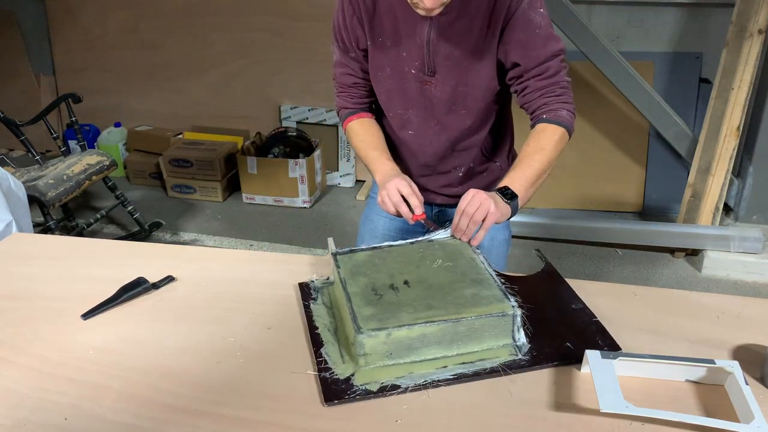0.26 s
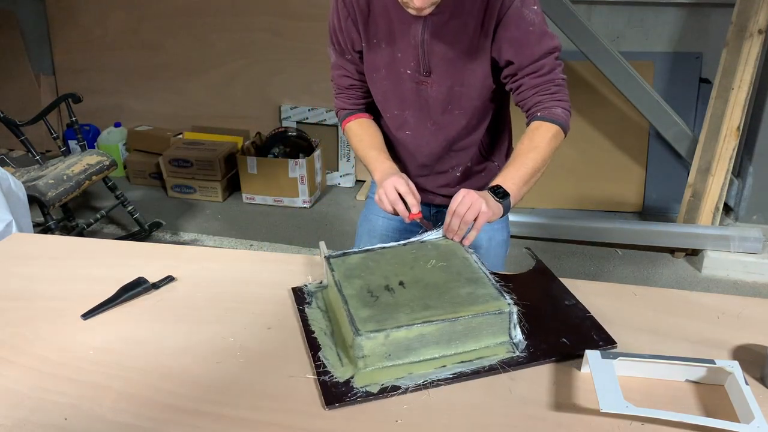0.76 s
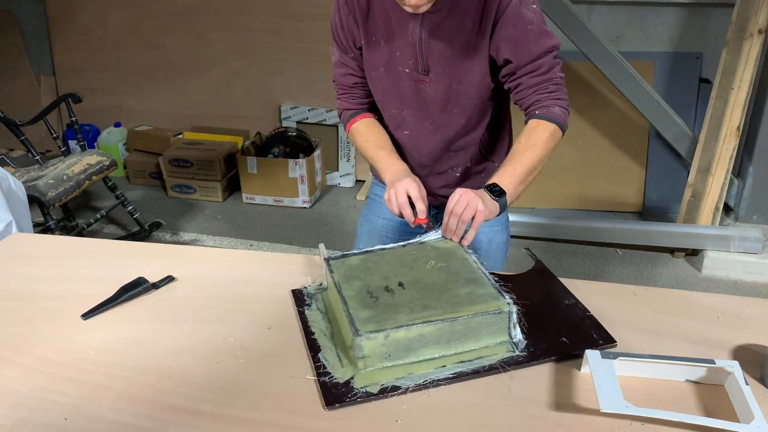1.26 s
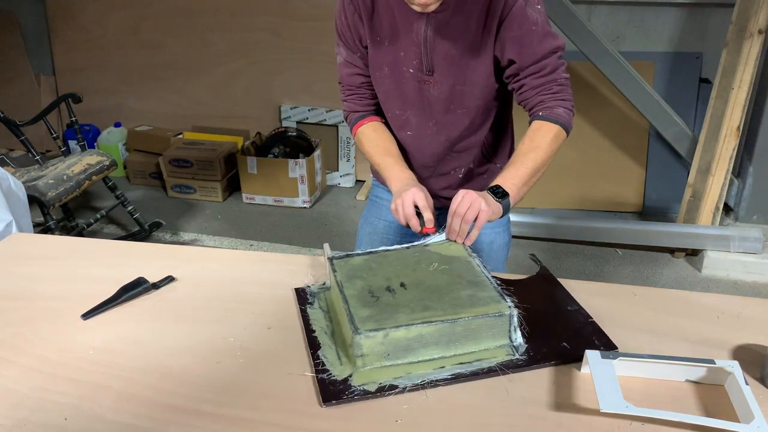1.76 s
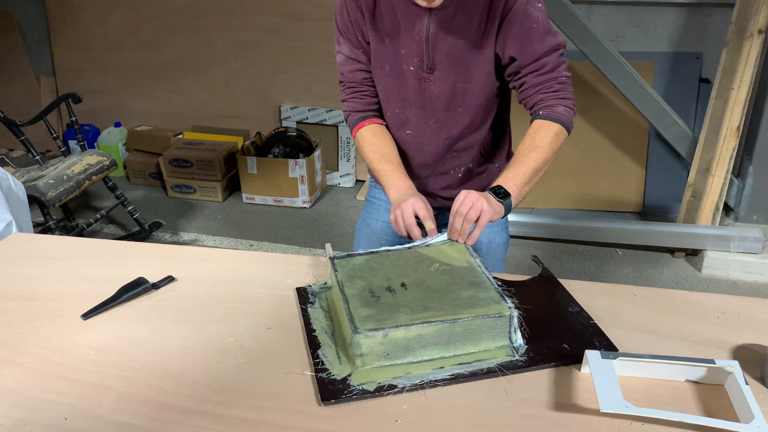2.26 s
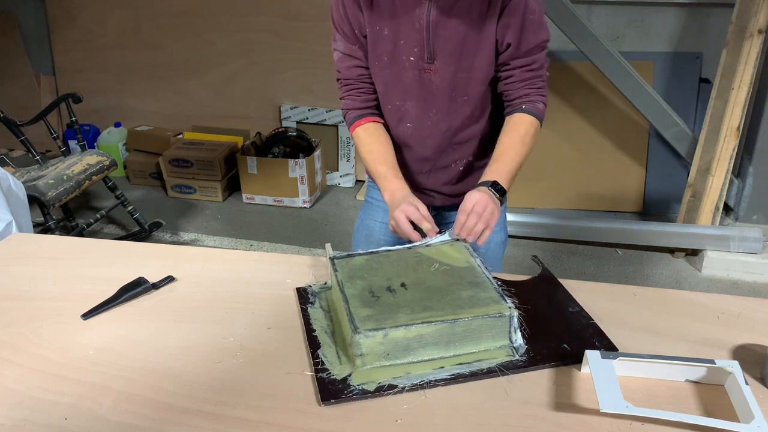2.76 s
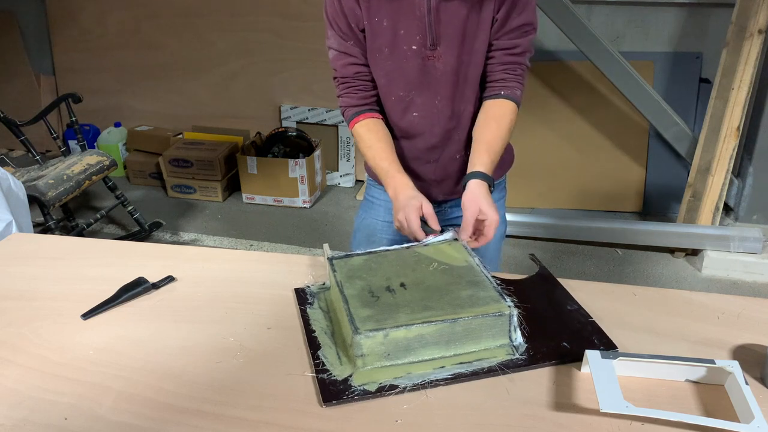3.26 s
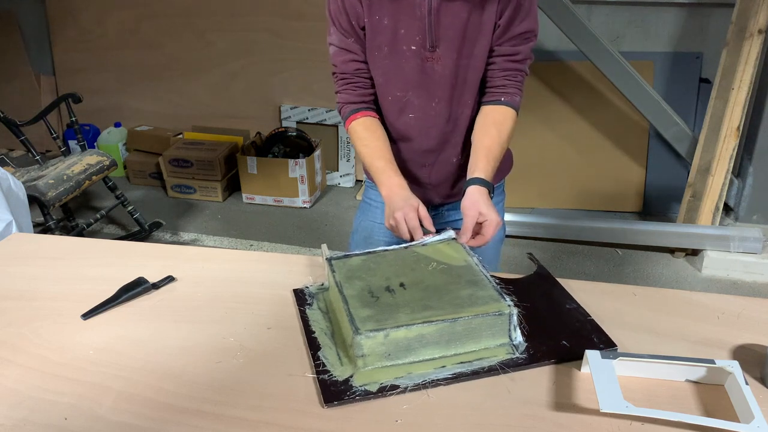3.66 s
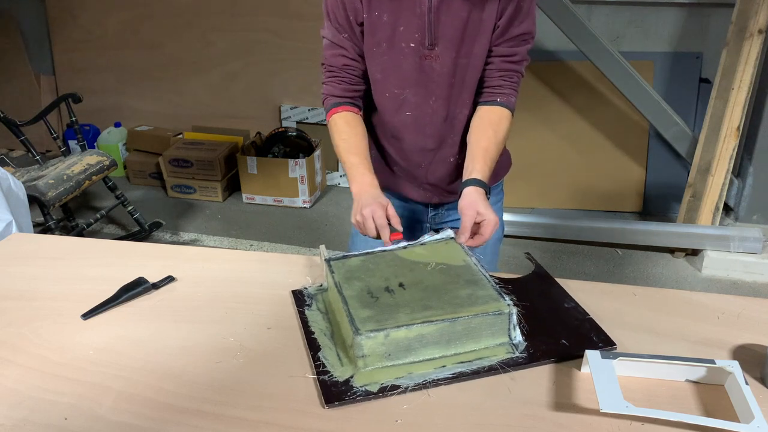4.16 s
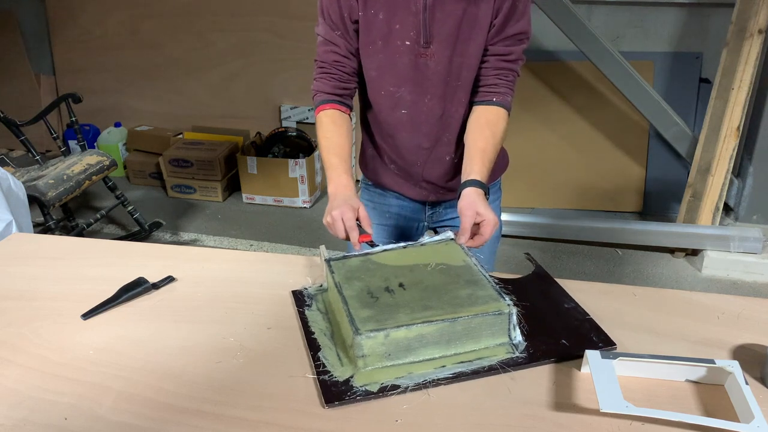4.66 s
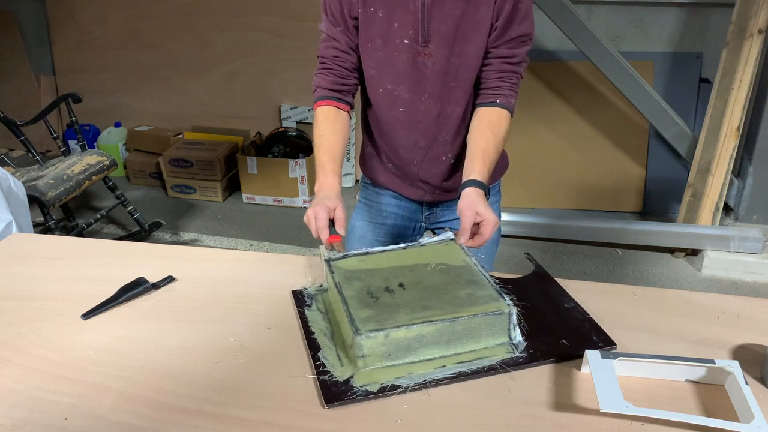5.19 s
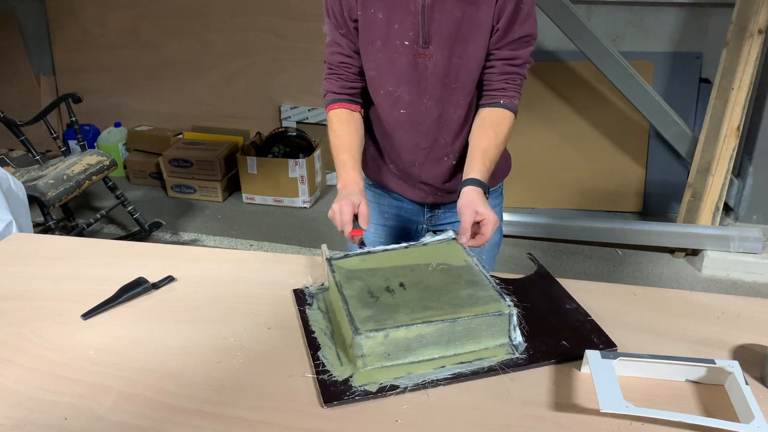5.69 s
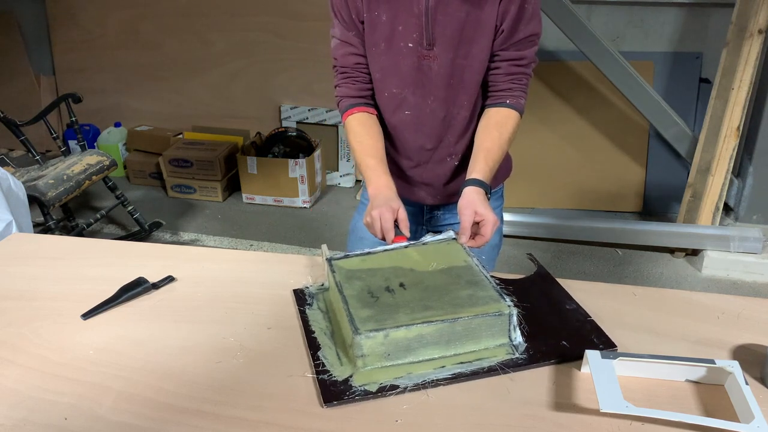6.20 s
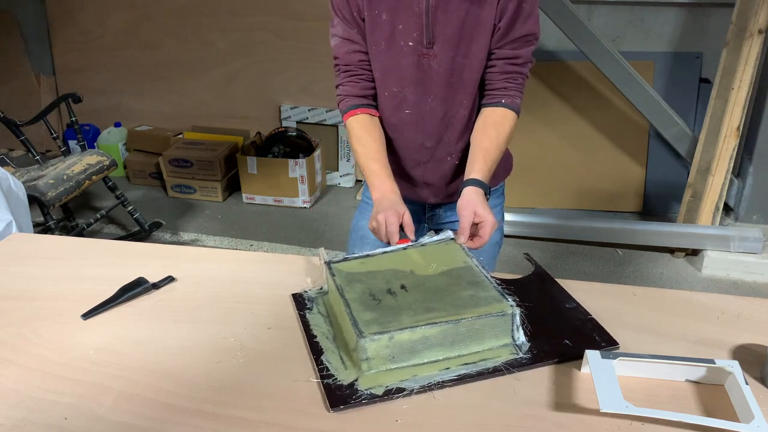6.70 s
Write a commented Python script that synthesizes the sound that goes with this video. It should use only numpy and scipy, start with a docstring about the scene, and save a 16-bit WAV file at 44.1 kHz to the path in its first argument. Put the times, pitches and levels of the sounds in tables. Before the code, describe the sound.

A hard fibreglass shell is pried off a wooden mold in a reverberant workshop, heard in stereo from fairly near over soft ventilation rumble and thin hiss. The hall's fading ring opens the scene; small sharp ticks come at 0.2-0.3 s, with a dull knock at 0.6. From 1.1 s crackling thickens into rasping, tearing fibres and bright snaps, loudest from 1.8 to 2.1 s, then dies by 2.3. Low thumps at 2.75 and 2.9 lead to faint splinter pings and a short stick-slip groan around 3.35. A hard crack lands at 4.15; from 4.4 snaps and gritty rubbing build to a strong final crack at 5.02. Dull knocks follow at 5.3-5.5, a brief wedge scrape at 5.75, and light chafing until 6.5. One more snap comes at 6.74, and a brighter sliding swish rises at the end, near 7 s.

```python
"""In an echoing workshop, a cured fibreglass shell is pried off a waxed wooden mold with a wedge, on a table.
With each push the bond lets go in sharp snaps, short noise bursts that set shell and rim ringing, over a
rasp of tiny fibre breaks made of noise grains. The mold knocks and groans on the table as ringing modes and
a stick-slip tone, the wedge slides and chafes along the rim as filtered grit, splinters ping, and the hall
rumbles softly and sends back reflections. In names, t60 is the time in which a sound fades by 60 dB."""
import sys
import numpy as np
from scipy import signal
from scipy.fft import rfft, irfft, next_fast_len
from scipy.io import wavfile
from scipy.ndimage import uniform_filter1d, map_coordinates

SR = 44100
rng = np.random.default_rng(int(sys.argv[2]) if len(sys.argv) > 2 else 0)


def wav_out(sig):
    """Save sig, one row per channel (or a flat mono array), as 16-bit PCM at SR to the path in sys.argv[1]."""
    wavfile.write(sys.argv[1], SR, np.round(np.clip(np.atleast_2d(sig).T, -1, 1) * 32767).astype(np.int16))


N = 306054


def amp(db):
    """Turn decibels into a gain."""
    return 10 ** (np.asarray(db) / 20)


def unit(x):
    """Scale a sound to an average (rms) level of 1."""
    return x / np.sqrt(np.mean(x ** 2) + 1e-20)


def burst(x):
    """Scale a short sound to the energy of 10 ms at rms 1."""
    energy = np.mean(np.sum(x ** 2, axis=-1))
    return x / np.sqrt(energy / (SR / 100) + 1e-20)


def along(points, hz):
    """Read a curve of (Hz, value) points at any pitch, on a log pitch axis."""
    point_hz, value = np.transpose(points)
    return np.interp(np.log(hz + 1), np.log(point_hz + 1), value)


def curves(rows):
    """Draw one value per sample for each column after the time."""
    time_s, *columns = np.transpose(rows)
    return [np.interp(np.arange(N) / SR, time_s, column) for column in columns]


def wobble(rate):
    """Make a smooth random curve with `rate` turning points drawn per second."""
    knots = rng.standard_normal(int(N * rate / SR) + 4)
    return map_coordinates(knots, [np.arange(N) * rate / SR])


def filtered(x, response):
    """Multiply the spectrum of x by a response that depends on pitch."""
    n = x.shape[-1]
    padded = next_fast_len(n + 2048)
    hz = np.fft.rfftfreq(padded, 1 / SR)
    return irfft(rfft(x, padded) * response(hz), padded)[..., :n]


def coloured(x, points):
    """Shape x with a tone colour given as (Hz, dB) points."""
    return filtered(x, lambda hz: amp(along(points, hz)))


def resonate(x, peaks):
    """Send x through side-by-side resonances (pitch_hz, width_hz, level_db), then scale to rms 1."""
    def response(f):
        total = 0
        for k, (hz, width, db) in enumerate(peaks):
            peak = 1j * f * width / (hz * hz - f * f + 1j * f * width)
            total = total + (-1) ** k * amp(db) * peak  # neighbours have opposite signs
        return total

    return unit(filtered(x, response))


# how alike left and right are in the hall's diffuse sound: pitch_hz, likeness (1 = the same)
HALL_LIKENESS = [(60, .98), (150, .93), (300, .8), (600, .15), (2000, .2), (5000, .15), (8000, .94),
                 (15000, .97)]


def diffuse(pair):
    """Blend two unrelated sounds so left and right are as alike as sound from all sides at two microphones."""
    def shares(hz):
        turn = np.arccos(np.clip(along(HALL_LIKENESS, hz), -1, 1)) / 2
        return np.array([np.cos(turn), np.sin(turn)])

    mid, side = filtered(pair, shares)
    return np.array([mid + side, mid - side])


def add(track, s, sound):
    """Mix a sound into a track at s seconds; it may already be under way at time 0."""
    at = round(s * SR)
    start = max(at, 0)
    sound = sound[..., max(-at, 0):]
    track[..., start:start + sound.shape[-1]] += sound[..., :N - start]


def ring(modes, t, scatter_db, detune, spread):
    """Ring a body's modes in stereo, each with a random strength, pitch shift and left-right phase."""
    hz, db, t60 = np.transpose(modes)[:, :, None]
    size, shift, phase, turn = rng.standard_normal((4, len(modes), 1))
    decay = amp(db + scatter_db * size - 60 * t / t60)
    angle = 2 * np.pi * (hz * (1 + detune * shift) * t + phase)
    return np.array([np.sum(decay * np.sin(angle + side * spread * turn), axis=0) for side in (1, -1)])


def splinter(t, spectrum, t60, jag_db):
    """Make a short jagged spray of fading noise, a little different on the left and right."""
    mid, side = coloured(rng.standard_normal((2, len(t))), spectrum) * [[1], [.3]]
    jags = np.interp(np.arange(len(t)), np.linspace(0, len(t), 100), rng.standard_normal(100))
    return np.array([mid + side, mid - side]) * amp(jag_db * jags - 60 * t / t60)


def crackle(rate, size_db, grain_t60):
    """Break noise into fading grains of very unequal size, about `rate` of them a second."""
    sizes = amp(size_db * np.minimum(rng.exponential(size=N), 3))
    breaks = (rng.random(N) < rate / SR) * sizes
    fade = amp(-120 * np.arange(SR // 50) / SR / grain_t60)  # power, so 60 dB down after grain_t60
    power = signal.fftconvolve(breaks ** 2, fade)[:N]
    return np.sqrt(np.abs(power)) * rng.standard_normal((2, N))


# tone of the hall's low noise: pitch_hz, level_db
RUMBLE_COLOUR = [(13, -40.5), (22, -27), (40, -9), (91, -2), (134, -7), (151, -10), (187, -6), (238, -12),
                 (269, -14.5), (298, -9.5), (361, -19), (608, -26), (749, -19.5), (907, -32), (1400, -48.5),
                 (1820, -81), (3080, -120)]


def hall():
    """Ventilation rumbles as low noise that drifts in level, with a faint hum and a thin hiss."""
    rumble = unit(coloured(diffuse(rng.standard_normal((2, N))), RUMBLE_COLOUR))
    hum = np.sin(2 * np.pi * 299 * np.arange(N) / SR + wobble(9))
    hiss_colour = [(500, -11.5), (2000, -6), (6000, -7.5), (12000, -12.0), (16000, -21.5)]  # Hz, dB
    hiss = unit(coloured(diffuse(rng.standard_normal((2, N))), hiss_colour))
    return (amp(-51 + 3.4 * wobble(3.8)) * rumble
            + amp(-65 + 3 * wobble(5)) * hum
            + amp(-78.5 + 1.4 * wobble(12)) * hiss)


# tone of the hall's fading ring: pitch_hz, level_db
FADING_COLOUR = [(400, -7), (1500, -5), (3000, -5), (5000, 5.5), (7000, 8), (11000, 4.5), (16000, -5)]


def fading(start_db=-44, t60=0.45):
    """The hall is still ringing from an earlier break: a wash of noise that fades from the start."""
    wash = unit(coloured(diffuse(rng.standard_normal((2, N))), FADING_COLOUR))
    return wash * amp(start_db - 60 * np.arange(N) / SR / t60)


def radiated(x, smear_s=0.011):
    """Each direction gets its own mix of upper modes, so the hall gets them as noise of the same smoothed shape."""
    low = filtered(x, lambda hz: 1 / (1 + (hz / 1300) ** 6))
    _, frames, z = signal.stft(x - low, SR, nperseg=128)
    power = uniform_filter1d(np.abs(z) ** 2, size=5, axis=0)  # blur over pitch
    power = signal.lfilter([1], [1, -np.exp(-frames[1] / smear_s)], power)  # blur over time
    grain = signal.stft(rng.standard_normal(N), nperseg=128)[2]
    high = signal.istft(grain * np.sqrt(np.abs(power)), nperseg=128)[1][:N]
    return low + unit(high) * np.std(x - low)


# how long the hall rings: pitch_hz, t60_s
HALL_T60 = [(100, .5), (300, .55), (800, .8), (2100, 1.0), (4000, .84), (6000, .73), (10000, .48),
            (15000, .33)]
# strength of the late ring: pitch_hz, level_db
LATE_COLOUR = [(200, 0.5), (700, 3.5), (1150, -5), (1700, -1), (2200, -3), (2600, -4), (3300, -0.5),
               (3900, -1.5), (5500, -3.5), (10000, -7.5), (15000, -7.5)]
EARLY_T60_S = .08  # table and near walls


def room(x, ringing, early_db=-14, late_db=-6.5, ringing_db=3):
    """Table and near walls give a short answer, the hall a long one; narrow tones keep their pitch in it."""
    hz, t, z = signal.stft(rng.standard_normal((2, SR)), SR, nperseg=256)
    late = z * amp(-60 * t / along(HALL_T60, hz)[:, None])
    late = signal.istft(late, SR, nperseg=256)[1][:, :SR]
    early_shape_db = 1.9 * rng.standard_normal(SR) - 60 * np.arange(SR) / SR / EARLY_T60_S
    early = rng.standard_normal((2, SR)) * amp(early_shape_db)

    def answer(source, tail):
        """Send the source through one set of reflections, 4 ms late."""
        tail = diffuse(tail / np.linalg.norm(tail[0]))
        tail = np.pad(tail, ((0, 0), (SR // 250, 0)))
        return signal.fftconvolve(source[None], tail, axes=1)[:, :N]

    mono = x.mean(axis=0)
    into_hall = coloured(radiated(mono) + amp(ringing_db) * ringing, LATE_COLOUR)
    return amp(early_db) * answer(mono + ringing, early) + amp(late_db) * answer(into_hall, late)


# stick-slip of the mold on the table: time_s, slips_per_s, level_db
GROAN = [(3.31, 130, -76), (3.324, 155, -45.5), (3.36, 130, -37), (3.39, 92, -40.5), (3.42, 98, -50.5),
         (3.46, 92, -71)]


def groan():
    """Stick-slip pushes the board in a short, mostly falling groan, a wavering tone with five harmonics."""
    rate, db = curves(GROAN)
    phase = 2 * np.pi * np.cumsum(rate * (1 + 0.041 * wobble(110))) / SR
    harmonics_db = [24.5, 23.5, -18.0, 0.5, -7.0]
    tone = sum(amp(level) * np.cos(k * phase) for k, level in enumerate(harmonics_db, start=1))
    floor = amp(max(db[0], db[-1]))  # silent outside the groan
    return unit(tone) * np.maximum(amp(db) - floor, 0)


# dull knocks of the mold: start_s, level_db (before a trim), hardness_hz, table_ring_db
KNOCKS = [(0.28, -47.5, 424, -13), (0.622, -38.5, 325, -2.5), (0.632, -32, 115, -7),
          (1.383, -32.5, 114.7, -24), (1.52, -44.5, 432.7, 2.5), (1.995, -42.5, 483, -5),
          (2.046, -37, 386, -12), (2.747, -43, 292, -4.5), (2.886, -27.5, 109.7, -41),
          (4.146, -40.5, 604, -3.5), (4.547, -45, 453, -3), (4.814, -39, 386, 0), (4.891, -42, 450, 1),
          (5.021, -39, 720, 2), (5.299, -29, 106.8, -29), (5.42, -36, 90.9, -28), (5.532, -35, 91, -29),
          (5.792, -43.5, 400, -0.5), (6.741, -39, 1050, -10)]
# ringing modes of the mold board on its table: pitch_hz, level_db, t60_s
BOARD = [(80, -6, 0.5), (106, -5, 0.065), (179, -5, 0.22), (249.4, 2.5, 0.22), (274, 1.5, 0.07),
         (361, -6, 0.11), (530, -10.5, 0.011), (649, 5, 0.036), (817, 5.5, 0.041)]
TABLE_HZ, TABLE_T60_S = 378, 0.16  # ring of the table top


def knocks(trim_db=-3.5, thud_db=-5, thud_t60=0.066, rise_s=0.0015):
    """The mold rocks on the table; a soft contact wakes only the lowest modes, with a thud of low noise."""
    out, t = np.zeros((2, N)), np.arange(SR // 3) / SR
    for s, db, hard_hz, table_db in KNOCKS:
        modes = []
        for hz, level, t60 in BOARD:
            softening_db = 10 * np.log10(1 + (hz / hard_hz) ** 6)
            modes.append((hz, level - softening_db, t60))
        modes.append((TABLE_HZ, table_db, TABLE_T60_S))
        board = ring(modes, t, scatter_db=2, detune=.035, spread=.08)
        thud_colour = [(30, -15), (hard_hz / 2, 0), (hard_hz, -3), (0.57 * hard_hz, -24), (8000, -80)]
        thud = unit(coloured(rng.standard_normal(len(t)), thud_colour))
        thud = amp(thud_db - 60 * t / thud_t60) * thud
        add(out, s, amp(db + trim_db) * (1 - np.exp(-t / rise_s)) * (board + thud))
    return out


# the wedge slides along the rim, twice: time_s, level_db
SLIDE = [(5.56, -82), (5.62, -60.5), (5.7, -51), (5.75, -46), (5.8, -47.5), (5.85, -55), (5.93, -82),
         (6.85, -83), (6.89, -59.5), (6.94, -38.5)]
# tone of the sliding grit: pitch_hz, level_db
SLIDE_COLOUR = [(300, -6), (550, -6.5), (900, 1.5), (1200, -4.5), (2200, 3), (3500, -6.5), (7000, -14),
                (15000, -29)]
# the rim's answer to a fast slide: pitch_hz, width_hz, level_db
SLIDE_RING = [(1100, 160, -3.5), (1750, 250, -1), (2160, 220, 2), (2750, 250, -3)]
SLIDE_FULL_DB, SLIDE_RING_DB = -45, -5.5  # level that counts as full speed; the rim's answer at that speed


def slide(rise_db=7, judder_db=2):
    """The wedge drags along the rim with a fine-grained swish that grows brighter as it speeds up."""
    [level_db] = curves(SLIDE)
    gain = amp(level_db) - amp(level_db.min())
    speed = np.clip(gain / amp(SLIDE_FULL_DB), 0, 1)
    grit = crackle(rate=4000, size_db=1, grain_t60=.012)
    grit = unit(coloured(diffuse(grit), SLIDE_COLOUR))
    dull = filtered(grit, lambda hz: 1 / (1 + (hz / 1250) ** 4))
    bright = (grit - dull) * amp(rise_db * (speed - 1.0))
    sing = resonate(crackle(rate=500, size_db=3, grain_t60=.006)[0], SLIDE_RING)
    sing = amp(SLIDE_RING_DB) * speed * sing
    return gain * amp(judder_db * wobble(70)) * (dull + sing + bright)


# the wedge chafes lightly on the rim: time_s, level_db
CHAFE = [(5.84, -77), (5.93, -61), (6.05, -73), (6.17, -71), (6.31, -86), (6.37, -76), (6.43, -65),
         (6.48, -75), (6.53, -94)]
# what the chafing excites: pitch_hz, width_hz, level_db
CHAFE_RING = [(1070, 81, -3.5), (2058, 290, -2), (2730, 150, 2), (4630, 390, -9), (6750, 340, -6)]


def chafe():
    """Light uneven slips of the wedge ring a few narrow resonances of the rim."""
    [level_db] = curves(CHAFE)
    slips = crackle(rate=250, size_db=3, grain_t60=.008)[0]
    return (amp(level_db) - amp(level_db.min())) * resonate(slips, CHAFE_RING)


# loose splinters ping and creak, and the first row is a broad sizzle near 4.9 kHz from the wedge rubbing during
# its push: start_s, pitch_hz, level_db (before a trim), width_hz
PINGS = [(0.956, 4900, -50, 900), (3.004, 2680, -50.5, 450), (3.097, 9900, -42, 500),
         (3.033, 2870, -49.5, 402), (3.096, 3030, -47, 350), (3.167, 2770, -42, 300),
         (3.168, 4760, -43, 600), (3.208, 1820, -46.5, 59.8), (3.304, 4700, -33.5, 646),
         (3.301, 5500, -40.5, 800), (3.303, 3230, -50, 300), (3.322, 1965, -46, 55), (3.323, 1080, -52, 60),
         (3.322, 3970, -53.5, 251), (5.925, 2146, -51, 149), (6.125, 2740, -61, 200),
         (6.17, 2220, -57, 150), (6.235, 2100, -60, 150), (6.415, 2830, -63, 149.5),
         (6.655, 2100, -61, 119.5)]


def pings(trim_db=-10.0, cycles=2.6):
    """Each row is a band of noise around its pitch that fades away: a freed splinter creaks broadly or rings at
    its own pitch, and the rubbing wedge adds a broad sizzle; the narrower the band, the longer it lasts."""
    out, t = np.zeros(N), np.arange(SR // 5) / SR
    for s, hz, db, width_hz in PINGS:
        buzz = filtered(rng.standard_normal(len(t)), lambda f: 1 / (1 + ((f - hz) / width_hz) ** 2))
        t60 = 0.024 + cycles / width_hz
        add(out, s, amp(db + trim_db) * burst(buzz * amp(-60 * t / t60)))
    return out


# pushes of the wedge: start_s, length_s, fizz_db, rub_db (both before trims), swell_db from start to end
PUSHES = [(0.185, 0.15, -61.5, -70, 10.5), (0.713, 0.0272, -69.5, -70, -7), (0.918, 0.05, -63, -55, 8.5),
          (1.116, 0.2, -54, -62, 17.5), (1.418, 0.17, -43.5, -48.5, 10.5), (1.75, .125, -45, -51.5, 7),
          (1.947, 0.25, -40, -45.5, -5.5), (3.008, 0.39, -95, -75, -4), (3.66, 0.097, -68.5, -74, -1),
          (3.962, 0.23, -56, -53.5, 12.5), (4.366, 0.057, -58, -58.5, 7), (4.429, 0.2, -46, -51.5, -10),
          (4.704, .32, -44.5, -46, 2), (5.74, .09, -58.5, -56.5, -14), (5.887, 0.39, -71.5, -77.5, -7),
          (6.369, 0.074, -69.5, -71, 7), (6.719, 0.055, -57, -52.5, 8.5)]
PUSH_ATTACK_S, PUSH_RELEASE_S = 0.045, 0.017  # the force builds up; after the push it dies by 60 dB


def effort():
    """Gains of fizz and rub: each push sets in, swells or eases while it lasts, and lets go."""
    gains = np.zeros((2, N))
    for s, length, fizz_db, rub_db, swell_db in PUSHES:
        t = np.arange(int((length + PUSH_RELEASE_S) * SR)) / SR
        swell = swell_db * (np.minimum(t / length, 1) - .5)
        release = 60 * np.maximum(t - length, 0) / PUSH_RELEASE_S
        level_db = swell - release + np.array([[fizz_db], [rub_db]])
        add(gains, s, np.minimum(t / PUSH_ATTACK_S, 1) * amp(level_db))
    return gains


# tone of the fibre fizz: pitch_hz, level_db
FIZZ_COLOUR = [(1000, -46.5), (4000, -15.5), (6500, 3), (9000, 1.5), (12000, -1.5), (16000, -4.5)]
# tone of the rub: pitch_hz, level_db
RUB_COLOUR = [(400, -27.5), (1100, 2), (1400, -17.5), (2200, 9), (3500, 0), (5000, 1), (7000, -16),
              (11000, -27)]
# the rub wakes these where the rim is free: pitch_hz, width_hz, level_db
RUB_RING = [(1620, 130, 0), (2160, 250, -2), (2820, 250, -7), (3500, 260, -4.5), (4260, 230, 2)]
RUB_RING_DB, RUB_RING_GROWS = -7, 0.54  # their level, and its growth in dB per dB of rim freedom


def rasp(fizz_db=1, rub_db=-3.0):
    """Tiny fibre breaks come in clumps while the bond peels; the shell rubs and ratchets on the waxed wood."""
    fizz_gain, rub_gain = effort()
    fizz = crackle(rate=700, size_db=4.5, grain_t60=.006)[0] * amp(2.5 * wobble(80))
    fizz = amp(fizz_db) * unit(coloured(fizz, FIZZ_COLOUR))
    rub = crackle(rate=900, size_db=3, grain_t60=.009)[0]
    # the contact point wanders, so the rub favours now one pitch range, now another
    z = signal.stft(rub, nperseg=256)[2]
    patches = uniform_filter1d(rng.standard_normal(z.shape), size=3, axis=0)
    patches = uniform_filter1d(patches, size=10, axis=1)
    rub = signal.istft(z * amp(4 * unit(patches)), nperseg=256)[1][:N]
    rub = amp(rub_db) * unit(coloured(rub, RUB_COLOUR))
    ratchet = resonate(crackle(rate=350, size_db=4, grain_t60=.003)[0], RUB_RING)
    rim_freedom_db = curves(PLACE)[0]
    ratchet = amp(RUB_RING_DB + RUB_RING_GROWS * rim_freedom_db) * ratchet
    return fizz_gain * fizz + rub_gain * (rub + ratchet)


# the shell's bending modes: pitch_hz, level_db, t60_s
SHELL = [(848, -9, 0.019), (1137.4, -3, 0.038), (1555, 0, 0.025), (1678, 4, 0.011), (1960, 5.5, 0.02),
         (2180, 8.5, 0.019), (2470, 1.5, 0.017)]
# the stiff rim's modes: pitch_hz, level_db, t60_s
RIM = [(2752, -6.5, 0.059), (3377, -1.5, 0.024), (3660, 1, 0.012), (4110, -1.5, 0.018), (4550, 5.5, 0.011),
       (5560, 2, 0.0079), (6150, 0.5, 0.019), (7020, 3, 0.02)]
# the shell's countless weak modes, as a tone colour: pitch_hz, level_db
SHELL_BLUR = [(250, -17), (700, -18.5), (1100, -9), (2400, 10), (3500, -9), (8000, -44.5)]
# the rim's countless weak modes, as a tone colour: pitch_hz, level_db
RIM_BLUR = [(1200, -35), (2700, -7), (4500, 0.5), (7000, -7), (11000, -30.5)]
# tone of the crack itself: pitch_hz, level_db
CRACK_COLOUR = [(300, -31), (1000, -27), (3000, -12), (5500, -10.5), (8500, 13), (11000, 9), (14000, 0.5),
                (16000, 3)]
CRACK_DB, RIM_DB, SHELL_DB = -2, -.5, -1.5  # trims of the parts of every snap
FRONT_DB, FRONT_TOP_DB = -4, -29.5  # front against tear; above this crack level the front's share shrinks
RUN_S = .05  # a strong break runs further: added t60 of the tear per unit of amplitude
FAVOUR_DB, FAVOUR_WIDTH = 6.5, 0.039  # lift of the mode that sings out; its reach as a share of its pitch
LOW_MODES_HZ = 1350  # the lowest shell modes lie below this


def snap(crack_db, rim_db, shell_db, tear_t60, shell_hz, rim_hz, low_db=-2, front_t60=0.0019,
         rim_rise_s=0.00052, shell_rise_s=0.0012, shell_blur_db=-6, rim_blur_db=-3):
    """One break: a steep front and a short tear set rim and shell ringing almost at once."""
    t = np.arange(SR // 20) / SR

    def favour(hz, centre):
        """Lift in dB around the pitch that sings out."""
        return FAVOUR_DB * np.exp(-((hz - centre) / (FAVOUR_WIDTH * centre)) ** 2)

    front = burst(splinter(t, CRACK_COLOUR, front_t60, jag_db=0))
    tear = burst(splinter(t, CRACK_COLOUR, tear_t60 + RUN_S * amp(crack_db), jag_db=2.5))
    crack = amp(FRONT_DB - max(crack_db - FRONT_TOP_DB, 0)) * front + tear

    shell = burst(ring(SHELL, t, scatter_db=1.5, detune=.025, spread=.2))
    shell = shell + amp(shell_blur_db) * burst(splinter(t, SHELL_BLUR, 0.025, jag_db=4.5))
    shell = filtered(shell, lambda hz: amp(low_db / (1 + (hz / LOW_MODES_HZ) ** 20) + favour(hz, shell_hz)))
    shell = shell * (1 - np.exp(-t / shell_rise_s))  # bending waves are slow, so the low ring swells later

    rim = burst(ring(RIM, t, scatter_db=3.5, detune=0.025, spread=0.72))
    rim = rim + amp(rim_blur_db) * burst(splinter(t, RIM_BLUR, 0.0088, jag_db=3.0))
    rim = filtered(rim, lambda hz: amp(favour(hz, rim_hz)))
    rim = rim * (1 - np.exp(-t / rim_rise_s))
    return (amp(CRACK_DB + crack_db) * burst(crack)
            + amp(RIM_DB + rim_db) * burst(rim)
            + amp(SHELL_DB + shell_db) * burst(shell))


def ticks(count=800, level_db=-3.5, scatter_db=4.5):
    """Small snaps of varied pitch follow one another unevenly as the crack creeps on, as strong as the push."""
    out, force = np.zeros((2, N)), effort()[1]
    kinds = []
    for k in range(28):
        shell_hz, rim_hz = SHELL[k % len(SHELL)][0], RIM[k % len(RIM)][0]
        kinds.append(snap(crack_db=0, rim_db=2.5, shell_db=-9, tear_t60=0.8, shell_hz=shell_hz, rim_hz=rim_hz))
    for k, (delay, size) in enumerate(rng.random((count, 2))):
        at = int((k + delay) / count * N)
        tick_db = level_db + 2 * scatter_db * (size ** 2 - 0.5)
        add(out, at / SR, force[at] * amp(tick_db) * kinds[k % len(kinds)])
    return out


# the loud snaps; a deep break flexes rim and shell, a shallow one only cracks:
# start_s, crack_db, rim_db, shell_db (all before trims), tear_t60_s (before the added run)
SNAPS = [(0.158, -58, -54.5, -80, 0.0049), (0.1843, -62.5, -60, -83, 0.004),
         (0.2101, -41, -47.5, -74, 0.003), (0.216, -41, -47, -75, 0.0065),
         (0.2706, -50.5, -69.5, -70, 0.005), (0.2793, -37.5, -47.5, -57, 0.0017),
         (0.2832, -36.5, -42, -53.5, 0.005), (0.6093, -69, -87, -82, 0.011),
         (0.6196, -72, -101, -67.5, 0.011), (0.7224, -58, -92, -85.0, 0.003),
         (0.73, -65.5, -80.5, -83, 0.005), (0.745, -53.5, -57.5, -69.5, 0.003),
         (0.75, -53, -61, -60.5, 0.0069), (0.9357, -67, -65, -68.5, 0.0039),
         (0.9427, -54, -58.5, -66.5, 0.0033), (0.9566, -52.5, -51.5, -66, 0.034),
         (1.1347, -59, -56.5, -63.5, 0.014), (1.1504, -57.5, -74.5, -73.5, 0.0054),
         (1.1569, -56.5, -71, -74, 0.006), (1.1838, -55.5, -62, -74.5, 0.005),
         (1.191, -45.5, -56, -71.5, 0.008), (1.2007, -48.5, -63.5, -73.5, 0.004),
         (1.224, -52, -59.0, -66, 0.008), (1.2316, -52.5, -61, -71, 0.009), (1.2547, -34.5, -45, -60, 0.01),
         (1.257, -45.0, -49, -62, 0.014), (1.2733, -51.5, -48, -67.5, 0.009),
         (1.2823, -36.5, -49, -55.5, 0.003), (1.308, -37.5, -46.5, -61.5, 0.0093),
         (1.3793, -45.5, -54.5, -66.5, 0.004), (1.4279, -35.5, -49.5, -53.5, 0.0033),
         (1.454, -50.5, -58, -64, 0.008), (1.4795, -37, -42.5, -55, 0.009),
         (1.4881, -38.5, -48.5, -62, 0.012), (1.4998, -33.5, -45.5, -49.5, 0.008),
         (1.5109, -32, -38, -34.5, 0.011), (1.52, -26, -29, -29.5, 0.0054),
         (1.5458, -37, -36.5, -42.5, 0.009), (1.5608, -40.0, -44.5, -42.5, 0.009),
         (1.5989, -42.5, -39.5, -47, 0.008), (1.7076, -50.0, -58.5, -57.5, 0.004),
         (1.7541, -34.5, -40.5, -41.5, 0.0054), (1.7697, -38.5, -51.5, -49.5, 0.0034),
         (1.8071, -23, -31.5, -32, 0.014), (1.8473, -37.5, -45.5, -50.0, 0.0086),
         (1.856, -26, -36.5, -37.5, 0.007), (1.876, -31.5, -39, -47.5, 0.012),
         (1.9458, -28.5, -24.5, -24.5, 0.009), (1.994, -17.5, -22, -24, 0.007),
         (2.0076, -23.5, -25, -28.5, 0.015), (2.0252, -31, -37, -42.5, 0.012),
         (2.0304, -32.5, -34.5, -36, 0.011), (2.0464, -26.5, -35, -30, 0.015),
         (2.08, -31.5, -30, -41, 0.016), (2.1651, -35, -37.5, -44.0, 0.016),
         (2.1876, -38.5, -39, -50, 0.018), (2.695, -62.5, -63.5, -50.5, 0.017),
         (2.7501, -59, -62.5, -52.5, 0.0066), (3.0027, -49, -60.5, -73.5, 0.0052),
         (3.0336, -67.5, -69, -80, 0.01), (3.0963, -48.5, -56, -82, 0.0104), (3.1447, -49, -65, -68, 0.005),
         (3.1624, -52.5, -62, -69.5, 0.01), (3.1684, -47.5, -53.5, -64, 0.0089),
         (3.2103, -65.5, -62, -64.5, 0.012), (3.3008, -51.5, -54, -74.5, 0.0047),
         (3.3234, -52, -52.5, -56, 0.0048), (3.9853, -43, -44, -39, 0.004),
         (4.0728, -39.5, -47.0, -53.5, 0.0076), (4.0852, -43.0, -45.5, -56.5, 0.004),
         (4.1173, -36, -41, -45, 0.004), (4.1205, -44, -49.5, -48.5, 0.005),
         (4.1408, -37, -36.5, -54.5, 0.004), (4.1459, -25.5, -24.0, -22, 0.0076),
         (4.1683, -39.5, -35, -46.5, 0.0085), (4.4195, -52, -52.5, -56.5, 0.005),
         (4.4284, -53.5, -50.5, -69, 0.008), (4.4451, -36.5, -37, -46, 0.0039),
         (4.4488, -38.5, -40, -47, 0.004), (4.4901, -35.5, -39, -54.5, 0.0062),
         (4.5006, -35.5, -32, -44.5, 0.004), (4.5069, -43, -48.5, -53.5, 0.007),
         (4.5233, -33.5, -36.5, -47.5, 0.004), (4.5307, -48, -53, -56, 0.006),
         (4.5468, -26, -30, -41.5, 0.003), (4.563, -37, -30.5, -39.5, 0.0028),
         (4.5831, -35.5, -39.0, -46, 0.015), (4.6134, -34, -40, -49, 0.0052),
         (4.6404, -43.5, -39.5, -43.5, 0.008), (4.6875, -52, -57, -61, 0.0074),
         (4.7014, -45, -51.5, -56.5, 0.006), (4.7051, -42.5, -39.5, -46, 0.0067),
         (4.7228, -37, -43.5, -50.0, 0.007), (4.7446, -34.5, -30.5, -44, 0.01),
         (4.7591, -48, -43.5, -57, 0.012), (4.8124, -40.5, -33.5, -42.5, 0.005),
         (4.8356, -36, -34, -55.5, 0.0058), (4.8479, -39, -37.5, -48, 0.006),
         (4.8569, -39.5, -39.5, -51.5, 0.005), (4.8685, -29, -28.5, -45, 0.005),
         (4.8805, -29, -32.5, -39.5, 0.006), (4.8916, -28, -28, -34.5, 0.0044),
         (4.9093, -38, -35.5, -40, 0.0061), (4.936, -33, -31.5, -38, 0.0032),
         (4.949, -28.0, -33, -40.0, 0.011), (4.9622, -24.5, -37.5, -41.5, 0.003),
         (4.9751, -32, -43, -46.5, 0.0045), (4.9819, -36.5, -51, -50.0, 0.0072),
         (4.9923, -31.5, -35.5, -38.5, 0.004), (5.0196, -20.5, -20.5, -28.0, 0.007),
         (5.8367, -51, -58, -64.5, 0.004), (5.9231, -70, -75, -60.5, 0.016), (6.126, -62, -71, -69, 0.016),
         (6.6854, -62.5, -75.5, -55.5, 0.007), (6.7391, -34.5, -31, -33.0, 0.0043)]
# the place of the wedge sets how the shell rings: time_s, rim_freedom_db,
# shell_hz and rim_hz (the pitches that sing out), low_db (lift of the lowest shell modes)
PLACE = [(.3, -1, 1830, 4400, 5.5), (1.3, -8, 1800, 5000, 0), (1.52, -2, 1105, 2900, -3),
         (1.8, -6.5, 2000, 4400, -13), (1.95, -4.5, 2167, 4150, -4.5), (2.0, -3.5, 1566, 4200, -5.5),
         (2.2, -4.5, 1597, 4500, 9.5), (4.14, -4, 2205, 3500, 5), (4.5, 2, 1625, 3550, 1.5),
         (4.74, 6.5, 1620, 2800, -6), (4.95, 3.5, 2140, 3700, -9), (5.02, 0, 2167, 3473, 4),
         (6.7, -4, 2139, 6200, -3)]


def snaps(lead_db=-14, lead_t60=0.013):
    """Each loud break rings according to its place; fibres start to give just before it."""
    out, t = np.zeros((2, N)), np.arange(SR // 20) / SR
    _, shell_hz, rim_hz, low_db = curves(PLACE)
    for s, crack_db, rim_db, shell_db, tear_t60 in SNAPS:
        at = round(s * SR)
        add(out, s, snap(crack_db, rim_db, shell_db, tear_t60, shell_hz[at], rim_hz[at], low_db[at]))
        lead = splinter(t, CRACK_COLOUR, lead_t60, jag_db=8)[:, ::-1]  # reversed, so it grows
        add(out, s - len(t) / SR, amp(crack_db + lead_db) * burst(lead))
    return out


# each band of the shell radiates a little to one side: pitch_hz, left_minus_right_db
LEAN = [(300, 0.5), (700, 3.5), (1150, 4), (2200, 3.5), (2900, 0), (3400, 1.5), (4000, -3), (5300, -5),
        (7000, 0.5), (14000, 0)]


def scene():
    """All the work at the mold, heard directly and through the hall, over the hall's own noise."""
    work = groan() + knocks() + slide() + rasp() + ticks() + snaps()
    ringing = chafe() + pings()
    direct = filtered(work + ringing, lambda hz: amp(along(LEAN, hz) * np.array([[.5], [-.5]])))
    return hall() + fading() + room(work, ringing) + direct


# tone of the microphones: pitch_hz, level_db
MIC_COLOUR = [(20, -10), (45, -1), (1000, 2.5), (2200, -3.5), (3500, -2), (5500, -4), (8500, -6),
              (11000, 2), (13500, 5.5), (15800, 2.5), (16400, -30.5)]
# phase between the two microphones: pitch_hz, left_lead_radians
MIC_PHASE = [(5800, 0), (6900, -.5), (8400, -3.1), (9500, -4.6), (10700, -6.3), (12000, -7.6),
             (13400, -9.4), (15500, -12.5)]
TOP_HZ = 17100  # nothing passes from here up


def record(dry):
    """The two microphones colour the sound, drift apart in phase in the treble and cut off the very top."""
    def response(hz):
        phase = .5 * along(MIC_PHASE, hz) * np.array([[1], [-1]])
        return np.exp(1j * phase) * (hz < TOP_HZ)

    return filtered(coloured(dry, MIC_COLOUR), response)


dry = scene()
out = record(dry)
wav_out(out)
```